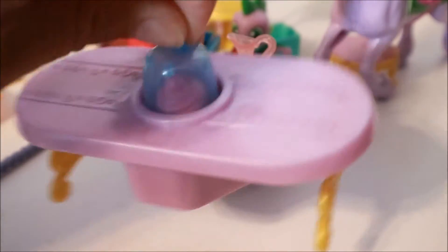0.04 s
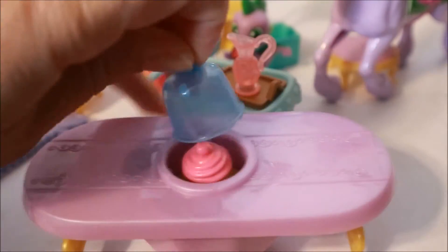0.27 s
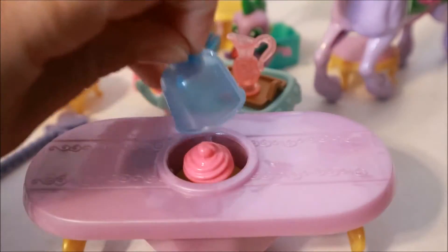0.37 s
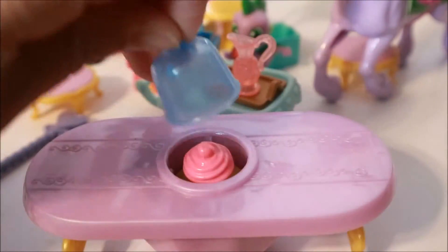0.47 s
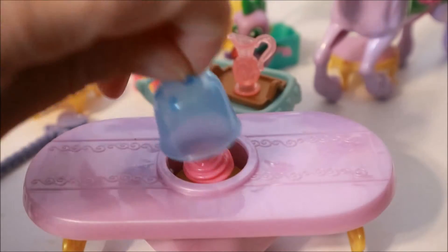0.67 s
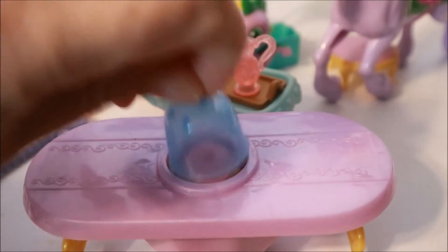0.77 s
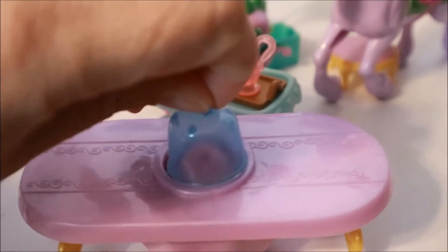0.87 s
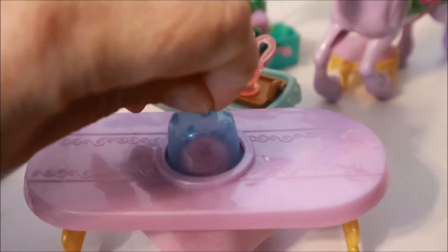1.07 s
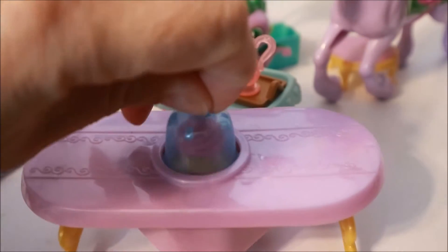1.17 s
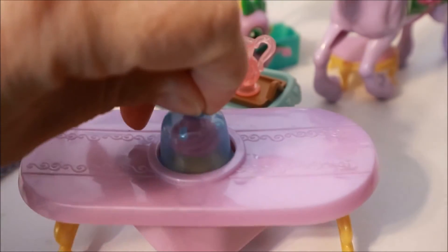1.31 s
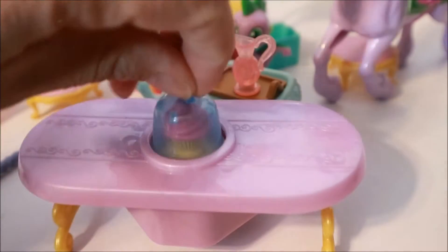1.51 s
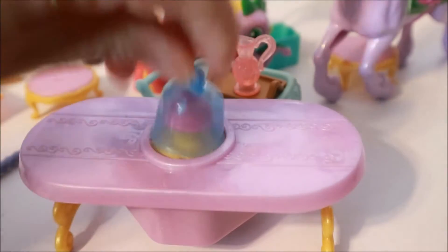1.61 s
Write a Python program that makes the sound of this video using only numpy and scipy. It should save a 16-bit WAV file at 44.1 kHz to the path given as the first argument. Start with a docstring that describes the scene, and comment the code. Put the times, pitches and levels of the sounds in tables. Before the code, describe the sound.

Small hard plastic toy pieces clatter, tap and snap together close up.

```python
"""A plastic cover on a toy table

A small clear cover is lifted out of the well of a hollow toy table, which drops back and clatters on
its legs. The cover is set back, rubs on the rim and is pressed home with a snap and a few taps.
Each touch makes the plastic parts ring, and the surface under the toy booms faintly after each blow.
It is all heard close up in a small quiet room."""
import sys
import numpy as np
from scipy import signal
from scipy.fft import rfft, irfft
from scipy.io import wavfile
from scipy.ndimage import uniform_filter1d

SR = 44100
rng = np.random.default_rng(int(sys.argv[2]) if len(sys.argv) > 2 else 0)


def int16_out(signal):
    """Quantize to a 16-bit WAV file."""
    q = np.round(np.clip(np.atleast_2d(signal).T, -1, 1) * 32767)
    wavfile.write(sys.argv[1], SR, q.astype(np.int16))


N = 72765
T = np.arange(N) / SR
SPECTRUM_HZ = np.arange(N + 1) * SR / (2 * N)

# Plastic hits plastic, and how strongly each part answers: (time [s], table hollow [dB], table top [dB],
# cover dome [dB], cover wall [dB], rim [dB], crack [dB], boom [dB])
TOUCHES = [ (.1900, -74, -51, -57, -34, -60, -60, -56), (.1922, -34, -26.5, -61, -32.5, -55, -39, -65),
           (.1983, -57, -40, -49, -28, -25, -36, -74), (.2260, -23.5, -28.5, -9, -15, -32, -18, -39),
           (.2316, -29, -39, -12, -20, -22, -16, -52), (.2380, -28, -40, -46, -55, -28, -17, -52),
           (.2412, -41, -40, -56.5, -23.5, -43, -38, -55.5),
           (.2486, -51.5, -39, -29.5, -24.5, -17.5, -35, -48.5),
           (.2534, -31.5, -33.5, -28.5, -24.5, -15, -26, -47.5),
           (.2848, -33, -23.5, -42, -25, -29.5, -40.5, -57.5),
           (.2882, -49, -55, -38.5, -19.5, -20, -22.5, -64), (.3935, -52, -36.5, -36, -30.5, -25, -33, -52),
           (.8803, -64.5, -39.5, -47.5, -45, -60.5, -64.5, -45),
           (.8862, -62, -42, -39.5, -43.5, -38.5, -57, -68.5), (.9156, -62, -45, -46, -43.5, -53, -67, -58),
           (.9218, -54, -33.5, -46, -36.5, -51, -73, -54), (1.0250, -51, -40, -64, -72, -71, -63, -49.5),
           (1.0542, -47, -35, -33, -39.5, -41.5, -49.5, -47.5),
           (1.2360, -78, -47, -45.5, -43.5, -48, -56, -87), (1.2586, -66, -55, -63, -30.5, -30.5, -60, -53),
           (1.2610, -61, -27, -28, -26.5, -40, -32.5, -42), (1.2690, -43, -32.5, -46, -34.5, -36, -27, -51),
           (1.3295, -54, -81, -49, -45.5, -56, -45, -85), (1.4583, -59, -32.5, -44, -42, -71, -78, -44.5),
           (1.4740, -58, -69, -58, -70, -75, -70, -45.5), (1.5530, -51, -50, -37, -39, -44, -69, -47.5),
           (1.5619, -62, -27.5, -48, -30.5, -49, -73, -50.5), (1.5700, -63, -52, -58, -47.5, -26, -41, -81),
           (1.6195, -64, -72, -51, -45, -58, -68, -56)]


def from_db(db):
    """Turn decibels into a number to multiply by."""
    return 10 ** (np.asarray(db) / 20)


def at_hz(points, hz):
    """Read between the rows of a table, giving every octave the same width."""
    row_hz, values = np.transpose(points)
    return np.interp(np.log(np.maximum(hz, 1)), np.log(row_hz), values)


def stereo_noise(spectrum):
    """Noise of strength 1 with the given spectrum, alike in both ears in the bass."""
    # how alike the ears are: (frequency [Hz], likeness [0 to 1])
    likeness = [(100, 1), (1000, 0.82), (2500, 0.49), (5000, 0.59), (9000, 0.067), (15000, .1)]
    alike = np.clip(at_hz(likeness, SPECTRUM_HZ), 0, 1)
    mid, side = rfft(rng.standard_normal((2, 2 * N)))
    white = irfft(np.sqrt(1 + alike) * mid + np.sqrt(1 - alike) * side * [[1], [-1]])[:, :N]
    noise = irfft(rfft(white, 2 * N) * from_db(at_hz(spectrum, SPECTRUM_HZ)))[:, :N]
    return noise / noise.std()


def clicks(times, gains):
    """Blows one sample long at the given times."""
    return np.bincount((times * SR).astype(int), gains, N)[:N]


def convolve(x, response):
    """Let every sample of x set off its own copy of the response."""
    return signal.fftconvolve(np.atleast_2d(x), np.atleast_2d(response), axes=-1)[:, :N]


def ring(blows, hz, ring_s):
    """Blows set one tone ringing; its ring time is how long it takes to fade by 60 dB."""
    decay, angle = from_db(-60 / (ring_s * SR)), 2 * np.pi * hz / SR
    treble_cut = signal.butter(2, min(2.4 * hz, SR * 4 / 9), fs=SR)  # little sound far above the tone
    soft = signal.lfilter(*treble_cut, blows + 1e-18)
    return signal.lfilter([.5, 0, -.5], [1, -2 * decay * np.cos(angle), decay ** 2], soft + 1e-18 * T)


def strike(times, db, tones, spread_db=3.5):
    """Each blow rings each tone of a part with its own strength; high tones stray left or right."""
    out = 0
    for k, (hz, tone_db, ring_s) in enumerate(tones):
        spread, lean = rng.standard_normal((len(times), 2)).T
        level = db + tone_db + spread_db * spread
        pan_db = lean * min(hz / 4000, 1.4) ** 2
        ears = [ring(clicks(times, from_db(level + side * pan_db)), hz, ring_s) for side in (.5, -.5)]
        out = out + (-1) ** k * np.array(ears)
    return out


def background(pip_hz=2450, pip_db=-61, pip_width_s=0.002):
    """Quiet room noise, a few faint high pips and a steady low rumble."""
    # the room noise: (frequency [Hz], relative level [dB])
    noise_spectrum = [(30, -21.5), (110, -9), (160, 0.5), (270, -11.5), (450, -11.5), (1000, -16),
                      (2700, -14.5), (4000, -23), (8000, -31.5), (16000, -48.5)]
    # its slow rise and fall: (time [s], level [dB])
    noise_levels = [(0, -60.5), (.17, -62), (.5, -68), (.62, -69), (.85, -69), (1.1, -64.5), (1.4, -58.5),
                    (1.65, -61.5)]
    # the pips: (time [s])
    pip_times = [0.056, 0.096, .697, 0.729, 0.832, .997, 1.43]
    # the rumble: (frequency [Hz], relative level [dB])
    rumble_spectrum = [(15, -14), (38, -0.5), (55, -3.5), (80, 2), (140, -7.5), (250, -23.5), (1000, -63.5)]
    noise = from_db(np.interp(T, *np.transpose(noise_levels))) * stereo_noise(noise_spectrum)
    pip_swells = sum(np.exp(-((T - time) / pip_width_s) ** 2) for time in pip_times)
    pips = from_db(pip_db) * pip_swells * np.sin(2 * np.pi * pip_hz * T)
    return noise + pips + from_db(-72.5) * stereo_noise(rumble_spectrum)


def room(sound):
    """Quick echoes off the toys nearby, then a tail in which each frequency band fades at its own pace."""
    # tone colour of the echoes: (frequency [Hz], relative level [dB])
    spectrum = [(100, -3.5), (250, 7), (600, 0), (1500, -1.5), (3500, -3), (7000, 3), (15000, -10)]
    # how long the tail lasts: (frequency [Hz], ring time [s])
    ring_times = [(100, 0.94), (400, 0.34), (1500, 0.17), (4000, 0.16), (8000, 0.097), (15000, 0.25)]
    near_db, near_delay_s, near_ring_s = -4.5, 0.001, 0.057
    tail_db, tail_delay_s = -9, 0.0071
    near = stereo_noise(spectrum) * (T > near_delay_s) * from_db(-60 * T / near_ring_s)
    noise = rfft(stereo_noise(spectrum), 2 * N)
    centres = np.geomspace(100, 15000, 8)
    tail = 0
    for centre, share in zip(centres, np.eye(len(centres))):
        band = irfft(noise * at_hz(np.c_[centres, share], SPECTRUM_HZ))[:, :N]
        tail = tail + band * (T > tail_delay_s) * from_db(-60 * T / at_hz(ring_times, centre))
    near *= from_db(near_db) / np.linalg.norm(near[0])
    tail *= from_db(tail_db) / np.linalg.norm(tail[0])
    return convolve(sound, near + tail)


def boom(rise_s=0.0024):
    """After each blow the surface under the toy hums on, amid a low rumble."""
    # the surface's tones: (pitch [Hz], relative level [dB], ring time [s])
    tones = [(150.9, -1.5, 0.47), (210.8, -14.5, 0.66)]
    # its rumble: (frequency [Hz], relative level [dB])
    spectrum = [(40, -30), (85, -7.5), (130, 4), (190, -1.5), (300, -8), (500, -15.5), (1000, -52.5)]
    times, *_, boom_db = np.transpose(TOUCHES)
    blow_power = clicks(times, from_db(2 * boom_db))

    def swell(ring_s):
        shape = (1 - np.exp(-T / rise_s)) ** 2 * from_db(-60 * T / ring_s)
        return np.sqrt(np.abs(convolve(blow_power, shape ** 2)))
    hum = sum(from_db(db) * swell(ring_s) * np.sin(2 * np.pi * (hz * T + rng.random()))
              for hz, db, ring_s in tones)
    return hum + from_db(-3.5) * swell(ring_s=0.31) * stereo_noise(spectrum)


def finger_pushes(bump_db=1.5, rise_s=0.0043):
    """Soft fingertips push the cover down; each makes a dull bump and lightly rings the table."""
    # the pushes: (time [s], relative level [dB], bump pitch [Hz])
    pushes = [(1.087, -44.5, 400), (1.1825, -42, 318), (1.1957, -34, 486)]
    # the pushed table's tones: (pitch [Hz], relative level [dB], ring time [s])
    tones = [(82.5, -1.5, 0.03), (163, -5.5, 0.022), (1052, -4, 0.049), (1525, -14, 0.019),
             (2600, -30, 0.011)]
    times, levels, _ = np.transpose(pushes)
    out = strike(times, levels, tones)
    for time, db, hz in pushes:
        age = np.maximum(T - time, 0)
        swell = (age / rise_s * np.exp(1 - age / rise_s)) ** 2
        out = out + from_db(db + bump_db) * swell * np.sin(2 * np.pi * hz * age)
    return out


def squeak(peak_s=0.3942, rise_s=0.0029, fall_s=0.00061, db=-22, roughness=0.0817):
    """Plastic sticks and sings roughly for a moment, jumping up in pitch just before it slips."""
    t = T - peak_s
    swell = np.exp(-np.maximum(-t / rise_s, t / fall_s) ** 4)
    smooth_hz = np.interp(t, [-0.00135, -0.00045], [2795, 4200])
    wobble = uniform_filter1d(rng.standard_normal(N), size=12)
    hz = smooth_hz * (1 + roughness * wobble / wobble.std())
    return from_db(db) * swell * np.sin(2 * np.pi * np.cumsum(hz) / SR)


def crack(times, db, spectrum, ring_s=0.0087, pan_db=0.7):
    """Many crowded high tones blur into a very short burst of noise."""
    decay = from_db(-120 / (ring_s * SR))
    power = signal.lfilter([1], [1, -decay], clicks(times, from_db(2 * db)) + 1e-18)
    return .5 * np.sqrt(power) * stereo_noise(spectrum) * from_db([[pan_db], [-pan_db]])


def plastic(times, *levels):
    """Touches ring the five parts and add a crack; each of these six has its own level."""
    # the tones of each part: (pitch [Hz], relative level [dB], ring time [s])
    table_hollow = [(417.7, -17.5, .025), (535.2, -8, 0.042), (643, -5.5, 0.023), (730, -13, .022)]
    table_top = [(817, -4.5, 0.024), (977, -7.5, 0.026), (1087, -8, 0.026), (1233, -6.5, 0.026)]
    cover_dome = [(1308, -4.5, 0.015), (1547, -2.5, 0.014), (1794, -2, 0.023), (1794, -5, 0.014),
                  (2040, 0.5, 0.0075)]
    cover_wall = [(2180, -7, 0.0037), (2610, 4.5, 0.005), (3040, 2.5, 0.0083), (3575, -1, 0.008),
                  (3950, -7, 0.014)]
    rim = [(4250, -3.5, 0.0036), (4990, -1.5, 0.002), (6530, -10.5, 0.0054), (7300, -18, 0.004)]
    # the crack: (frequency [Hz], relative level [dB])
    crack_spectrum = [(250, -1), (1500, -10.5), (4000, 7), (7000, 3), (10000, -1.5), (13000, -7.5),
                      (15500, -13)]
    parts = table_hollow, table_top, cover_dome, cover_wall, rim
    ringing = sum(strike(times, db, tones) for db, tones in zip(levels, parts))
    return ringing + crack(times, levels[-1], crack_spectrum)


def rubs(slip_count=12, spread_db=5):
    """Plastic slides on plastic in a quick uneven run of tiny slips that swells and fades."""
    # the slides: (start [s], length [s], table hollow [dB], table top [dB], cover dome [dB],
    # cover wall [dB], rim [dB], crack [dB])
    slides = [(0.19, .013, -65, -57, -46.5, -34, -30, -60), (0.239, .017, -37, -55, -44, -27, -33, -32),
              (0.283, 0.022, -46.5, -39.5, -38.5, -40.5, -32.5, -36),
              (1.011, 0.032, -64, -46.5, -57, -60, -65, -61),
              (1.179, .034, -57.5, -50, -57.5, -63, -62, -79),
              (1.24, 0.018, -65, -49.5, -46, -45, -67, -48.5),
              (1.461, 0.036, -84, -44.5, -56, -60.5, -64, -88),
              (1.502, 0.041, -64, -47, -53.5, -55, -73, -80), (1.568, 0.014, -59, -48, -50, -46, -58, -59)]
    slips = []
    for start, length, *levels in slides:
        progress = (np.arange(slip_count) + rng.random(slip_count)) / slip_count
        force_db = 20 * np.log10(np.sin(np.pi * progress)) + spread_db * rng.standard_normal(slip_count)
        slips.append([start + length * progress] + [db + force_db for db in levels])
    return plastic(*np.hstack(slips))


def pings(ring_cycles=41):
    """In some taps one tone stands out, its pitch set by the grip and the spot struck."""
    # these taps: (time [s], level [dB], pitch [Hz])
    taps = [(0.202, -29.5, 1205), (.2316, -7, 2670), (.2855, -20.5, 2014), (.9156, -32, 1863),
            (.9218, -29.5, 1904), (1.0542, -33, 1944), (1.2615, -23, 1116), (1.4785, -40, 900),
            (1.553, -33, 1027), (1.5625, -39, 3430), (1.6195, -36.5, 3350)]
    return sum(ring(clicks(np.array([time]), from_db([db])), hz, ring_cycles / hz)
               for time, db, hz in taps)


def snap():
    """The cover snaps home with one bright crack."""
    # the snap: (time [s], relative level [dB])
    snaps = [(1.2599, -21)]
    # its tone colour: (frequency [Hz], relative level [dB])
    spectrum = [(2000, 4), (7000, 7), (11000, 1), (14000, 7), (16000, -5)]
    return crack(*np.transpose(snaps), spectrum)


def clatter():
    """The table and its cover knock and tap, ringing the plastic."""
    times, *levels, _ = np.transpose(TOUCHES)
    return plastic(times, *levels)


def scene():
    """The toy's sounds with their echoes, over the boom and the background."""
    toy = clatter() + pings() + rubs() + snap()
    chirp, bumps = squeak(), finger_pushes()
    air = background()
    echoes = room(toy + from_db(-15) * bumps + from_db(-6) * chirp)
    return toy + bumps + chirp + echoes + boom() + air


def record(dry, cutoff_hz=16300):
    """Cut away the very highest treble."""
    return signal.sosfiltfilt(signal.cheby2(16, 50, cutoff_hz, fs=SR, output="sos"), dry)


dry = scene()
out = record(dry)
int16_out(out)
```